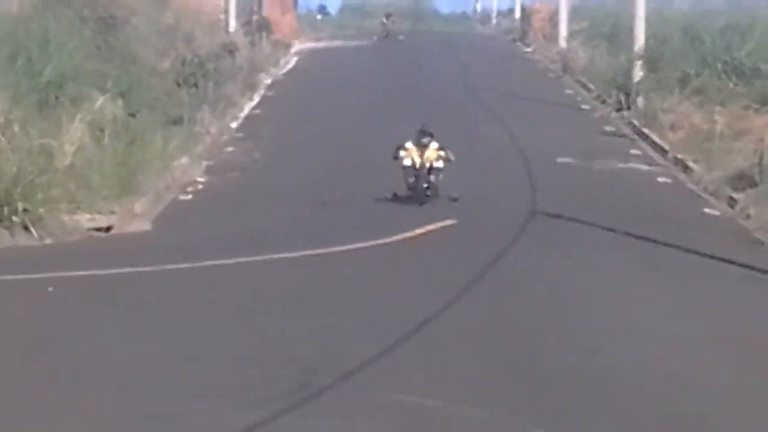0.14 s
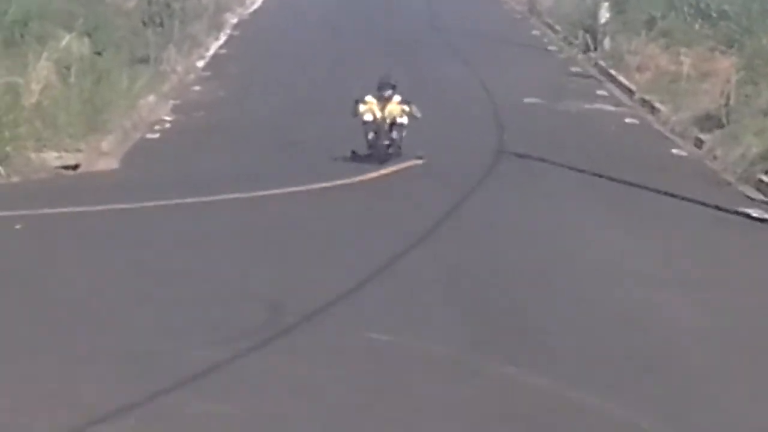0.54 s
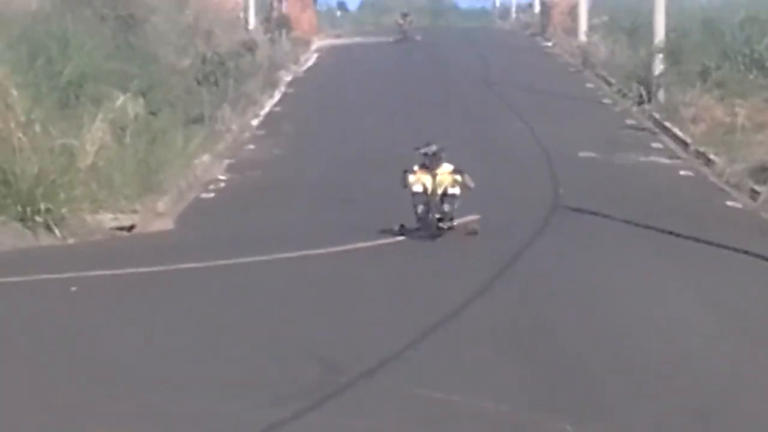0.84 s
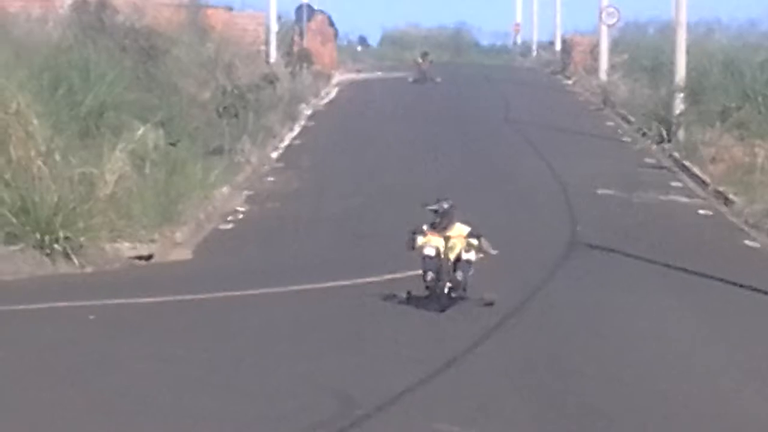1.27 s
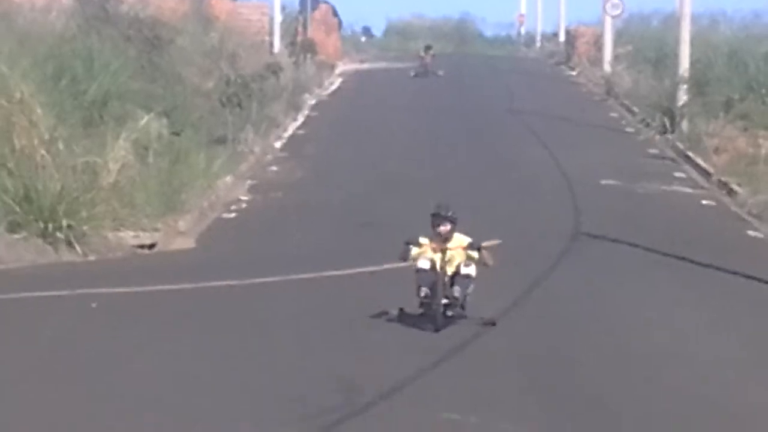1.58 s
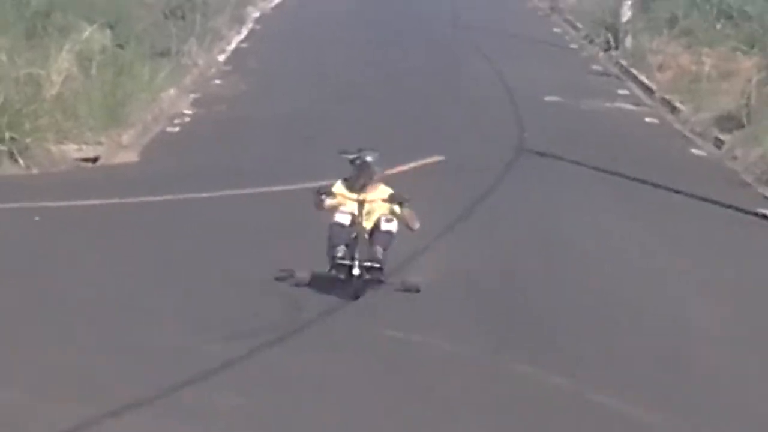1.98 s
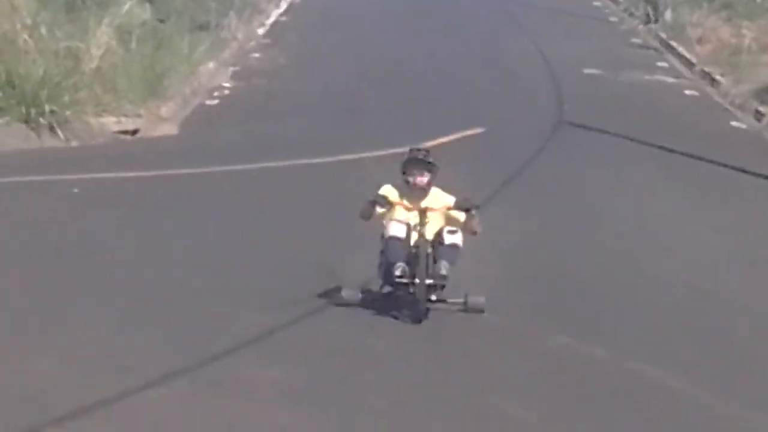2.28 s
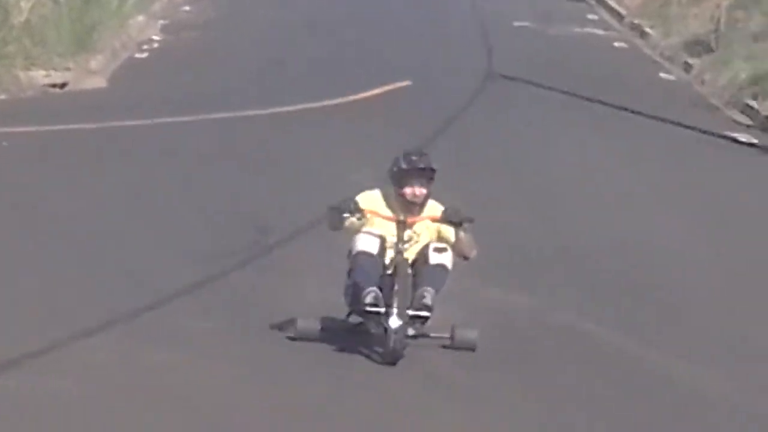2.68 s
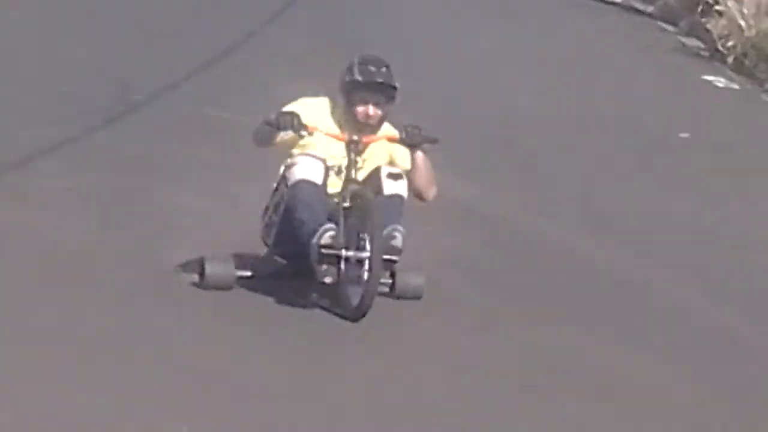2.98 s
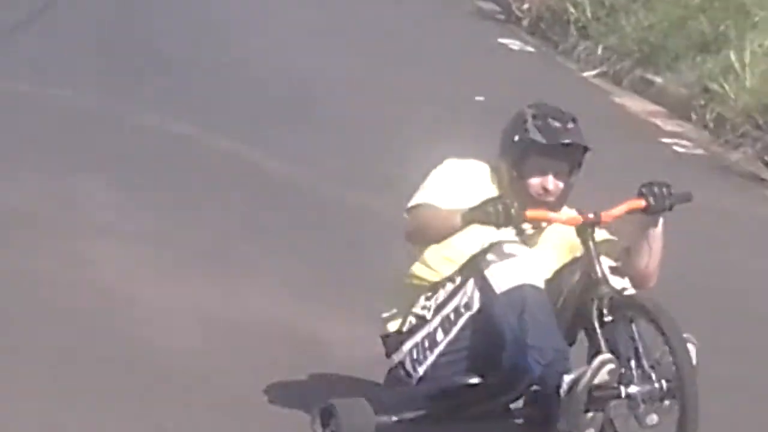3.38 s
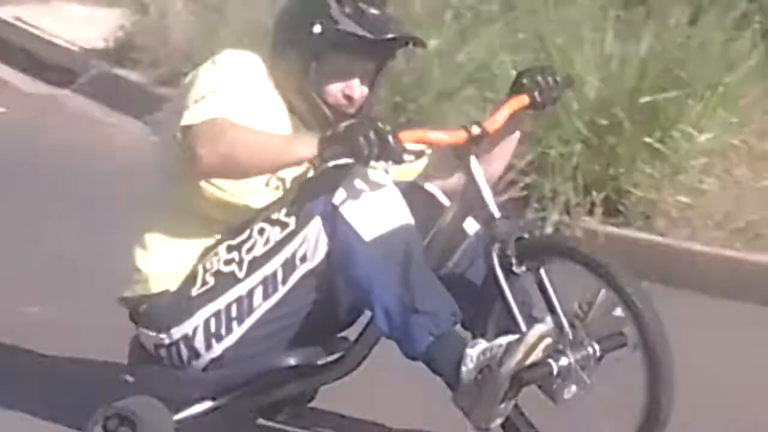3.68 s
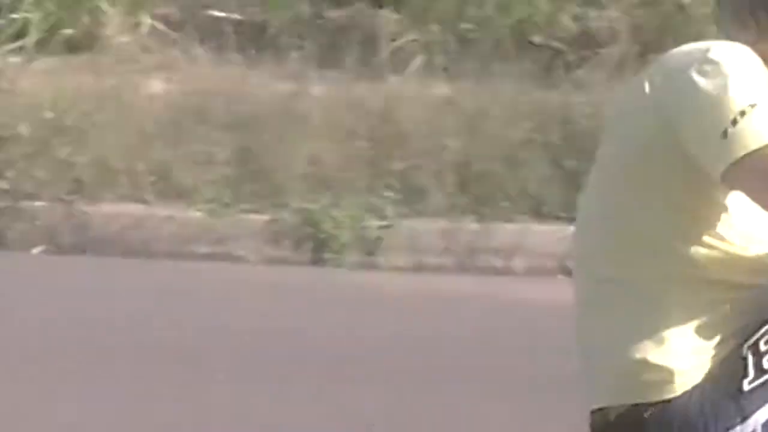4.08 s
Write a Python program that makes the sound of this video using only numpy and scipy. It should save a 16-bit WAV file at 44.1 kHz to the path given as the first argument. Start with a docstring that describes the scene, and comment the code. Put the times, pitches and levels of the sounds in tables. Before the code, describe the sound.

A drift trike with hard plastic rear wheels comes down an open asphalt road toward a small, bass-light microphone. At the start there is a gritty rolling hiss with a rough whirr, a clear mid-pitched ring and small bright pebble ticks; one very faint bird whistle falls at once, and a light knock and scrape follow at 0.1 s. The rolling stays fairly even until about 1.4 s, when it steps up and short wind puffs thump, mostly on the right, until 1.8 s. At 2.2-2.35 s a sudden rasping skid chatters with sharp ticks. Rolling resumes, louder, and from 3.0 s sideways scraping grows, gripping and releasing in abrupt barks and squeaky rasps. From 3.4 s hollow wheels drum and knock close by, the clear ring fades, and scrape tones shift. Heavy knocks and clipped, crackling ticks crowd 3.8-4.2 s as it slides past, still loud at the end.

```python
"""Drift trike sliding past on asphalt

A drift trike with hard plastic rear sleeves rolls down an asphalt road toward a small microphone and slides past.
Random grit impulses excite the sleeves' resonances: a hiss with ringing modes, a whirr and bright pebble ticks.
Sideways slips scrape and grip, the hollow wheels drum and knock on bumps, with sharp ticks of overloaded peaks.
Short puffs of wind thump on the microphone over a low gust, and one faint far bird whistles.
The microphone's small ports thin out the bass; a limiter eases the peaks and the loudest ones clip."""
import sys
import numpy as np
from scipy import signal
from scipy.fft import rfft, irfft, next_fast_len
from scipy.io import wavfile
from scipy.ndimage import uniform_filter1d, minimum_filter1d

SR = 44100
rng = np.random.default_rng(int(sys.argv[2]) if len(sys.argv) > 2 else 0)


def wrap_up_sound(samples):
    """Save the sound to the file named by the first command line argument, as 16-bit audio."""
    columns = np.atleast_2d(samples).T
    # keep every value between -1 and 1, then stretch to whole-number steps
    tamed = np.clip(columns, -1, 1)
    steps = np.round(tamed * 32767).astype(np.int16)
    wavfile.write(sys.argv[1], SR, steps)


def magnitude_from_level(level_db):
    """Linear magnitude for a level in decibels (20 dB per decade)."""
    exponent = np.asarray(level_db, float) / 20
    return 10 ** exponent


N = 186451
T = np.arange(N) / SR
SIZE = next_fast_len(N + 8192)  # transform length, padded so that ringing does not wrap around
HZ = np.fft.rfftfreq(SIZE, 1 / SR)
WAVER_PER_S = 6.4  # how fast each mode swells and fades as the contact patch wanders


def evened(x):
    """Scales to rms 1."""
    return x / np.sqrt(np.mean(x ** 2) + 1e-20)


def curve(points):
    """Reads a time table at every sample."""
    return np.interp(T, *np.transpose(points))


def read(points):
    """Reads a spectrum table on a log-frequency axis."""
    hz, value = np.transpose(points)
    return np.interp(np.log(HZ + 1), np.log(hz + 1), value)


def filtered(x, response):
    """Applies a frequency response to a signal."""
    return irfft(rfft(x, SIZE) * response, SIZE)[..., :N]


def peak(hz, width):
    """Complex response of one mode, gain 1 at its centre."""
    return 1 / (1 + 2j * (HZ - hz) / width)


def band(x, hz, width):
    """Two equal resonances in series leave one band, scaled to rms 1."""
    return evened(filtered(x, peak(hz, width) ** 2))


def lumps(per_s):
    """Slow noise of rms 1: white noise through a one-pole low-pass with its corner at per_s Hz."""
    pole = np.exp(-2 * np.pi * per_s / SR)
    return evened(signal.lfilter([1], [1, -pole], rng.standard_normal(N)))


def body(x, colour, modes, waver_db=5):
    """A broad colour plus the ringing modes of the struck part, each wavering on its own."""
    coloured = filtered(x, magnitude_from_level(read(colour)))
    out = coloured
    for hz, width, db in modes:
        ring = (magnitude_from_level(db) - 1) * filtered(coloured, peak(hz, width))
        out = out + magnitude_from_level(waver_db * lumps(WAVER_PER_S)) * ring
    return out


def grit(per_s, spread_db, lump_per_s, lump_db):
    """Stones meet the wheel at random, a few are large, and they come in clumps."""
    hit = rng.random(N) < per_s / SR
    size = magnitude_from_level(spread_db * np.minimum(rng.exponential(1, N), 4))
    sign = rng.choice([-1., 1.], N)
    return evened(hit * size * sign * magnitude_from_level(lump_db * lumps(lump_per_s)))


def swell(s):
    """Quick rise and slower fall of one puff or knock, peak 1."""
    u = np.maximum(T - s, 0) / 0.0022  # rise time in s
    return u * np.exp(1 - u)


def thump(s, db, hz):
    """A few cycles under one swell, sagging in pitch from 1.15 times hz."""
    sag = 28  # the pitch falls by 2 * sag * hz per second
    u = np.clip(T - s, 0, .5 / sag)  # the phase stops before the pitch reaches zero
    return magnitude_from_level(db) * swell(s) * np.sin(2 * np.pi * hz * u * (1.15 - sag * u))


def recorder_rumble():
    """Faint noise of the recorder below 80 Hz, independent in each channel."""
    low = signal.butter(4, 80, fs=SR, output="sos")
    return magnitude_from_level(-88) * evened(signal.sosfilt(low, rng.standard_normal((2, N))))


def chirp():
    """One faint falling whistle of a far bird: a gliding sine under a half-sine swell."""
    # The whistle: (start [s], length [s], from [Hz], to [Hz], level [dB])
    whistle = (.044, .042, 6250, 5050, -47)
    s, length, from_hz, to_hz, db = whistle
    u = np.clip((T - s) / length, 0, 1)
    phase = 2 * np.pi * np.cumsum(from_hz + (to_hz - from_hz) * u) / SR
    return magnitude_from_level(db) * np.sin(np.pi * u) * np.sin(phase)


def wind():
    """Short thumps with a little turbulence, mostly at the right port, over a lumpy low gust."""
    # Wind puffs before the port gains: (start [s], level [dB], base pitch [Hz])
    puff_rows = [(1.367, -19, 336), (1.383, -32, 370), (1.43, -28, 320), (1.439, -16, 404),
                 (1.455, -21.5, 280), (1.469, -24, 292), (1.489, -22, 550), (1.5, -27, 400),
                 (1.513, -24, 301), (1.534, -40, 620), (1.572, -19, 455), (1.695, -16.5, 457),
                 (1.711, -22, 656), (1.734, -27, 293), (1.754, -25.5, 694), (1.783, -17.5, 484),
                 (1.799, -26.5, 304)]
    # Colour of the turbulence: (frequency [Hz], level [dB])
    puff_colour = [(60, -14.5), (150, -15), (320, -9), (500, -12.5), (800, -15), (1500, -51.5)]
    # Course of the gust before the port gains: (time [s], level [dB])
    gust_course = [(.85, -63), (1.0, -59), (1.3, -57), (1.4, -32), (1.55, -42), (1.85, -42), (2.0, -49.5),
                   (2.25, -33.5), (2.5, -62), (2.6, -78)]
    hiss_db = -11  # turbulence against the thump
    air = rng.standard_normal((3, N))
    # air[0] reaches both ports, the others one port each
    ports = np.array([evened(body(air[0] + 1.4 * own, puff_colour, [])) for own in air[1:]])
    puffs = sum(thump(s, db, hz) + magnitude_from_level(db + hiss_db) * swell(s) * ports for s, db, hz in puff_rows)
    gust = magnitude_from_level(curve(gust_course) + 3.1 * lumps(24)) * ports
    return puffs * magnitude_from_level([[-16], [4]]) + gust * magnitude_from_level([[-3], [2]])  # dB at left, right


def drumming():
    """Hollow wheels drum on the grit up close, surging as they skip."""
    # Colour of the drumming: (frequency [Hz], level [dB])
    drum_colour = [(80, -65), (160, -17), (240, -14), (310, -5.5), (450, -2.5), (620, 0), (830, -4),
                   (1000, -12), (1300, -6), (2000, -28)]
    # Modes of the hollow wheel: (frequency [Hz], width [Hz], boost over the colour [dB])
    drum_modes = [(343.4, 19, 7), (503, 46, 9.5), (654.5, 25, 9.5), (732, 27, 6)]
    # Loudness of the drumming: (time [s], level [dB])
    drum_course = [(0, -45), (2.2, -37.5), (2.225, -32), (2.34, -24.5), (2.36, -36.5), (2.9, -54.5),
                   (2.95, -45), (3.028, -37.5), (3.042, -43), (3.07, -28.5), (3.226, -20.5), (3.294, -25),
                   (3.33, -31.5), (3.348, -20), (3.381, -31.5), (3.409, -12), (3.442, -20.5),
                   (3.541, -18.5), (3.559, -25), (3.582, -17), (3.684, -17.5), (3.706, -25), (3.76, -14.5),
                   (3.77, -15.5), (3.834, -10.5), (3.88, -15.5), (3.89, -17.5), (3.972, -16), (3.99, -14),
                   (4.117, -16.5), (4.126, -18.5), (4.19, -9.5), (4.228, -21.5)]
    bumps = grit(1500, 3, lump_per_s=40, lump_db=1.2)
    drum = evened(body(bumps, drum_colour, drum_modes, waver_db=3))
    return magnitude_from_level(curve(drum_course)) * drum


def knocks():
    """Single low knocks of the hollow wheels on bumps, each a sagging thump."""
    # Knocks: (start [s], level [dB], base pitch [Hz])
    knock_rows = [(0.107, -28.5, 396), (3.168, -13, 454), (3.344, -19, 546), (3.4, -11.5, 584),
                  (3.577, -5.5, 554), (3.617, -10, 620), (3.733, -8.5, 619), (3.785, -7, 651),
                  (3.89, -7.5, 546), (3.986, -9.5, 526), (4.017, -7.5, 520), (4.033, -15, 680),
                  (4.06, -6, 608), (4.088, -8.5, 726), (4.125, -3, 658), (4.15, -5.5, 653),
                  (4.164, -10, 513), (4.193, -8, 628)]
    return sum(thump(*row) for row in knock_rows)


def tick(s, db, hz):
    """A tick: a sine that starts at once and dies in a few cycles."""
    decay_s = .0003  # time constant
    u = np.clip(T - s, 0, 20 * decay_s)
    return magnitude_from_level(db) * 2 * np.exp(-u / decay_s) * np.sin(2 * np.pi * hz * u) * (u < 20 * decay_s)


def overload_ticks():
    """Sharp ticks of overloaded peaks, each a short decaying sine."""
    # Ticks: (start [s], level [dB], pitch [Hz])
    tick_rows = [(1.785, -16.5, 1500), (2.2596, -8.5, 3000), (2.292, -16, 4500), (3.082, -12.5, 3000),
                 (3.833, -5, 3500), (3.896, -10, 2500), (4.0074, -1.5, 4020), (4.038, -6, 4000),
                 (4.182, -5.5, 4500), (4.191, -12, 3000)]
    return sum(tick(*row) for row in tick_rows)


def pebbles(roll_db):
    """Sparse kicked pebbles tick brightly, 28 dB under the rolling hiss."""
    kicked = grit(60, 2.4, lump_per_s=1.7, lump_db=3.5)
    return magnitude_from_level(roll_db - 28) * band(kicked, 4700, 1400)


def rolling(roll_db):
    """The same grit gives the rolling hiss, the rough whirr and the sleeve's clearest ring."""
    # Colour of the grit, with the notches of the road bounce: (frequency [Hz], level [dB])
    roll_colour = [(100, -48), (180, -22.5), (400, -10.5), (700, -6), (790, -18), (900, -4.5), (1190, -9.5),
                   (1500, -5), (2400, -5), (4600, -8), (5400, -17.5), (7000, -35), (9500, -116)]
    # Modes of the rolling sleeve: (frequency [Hz], width [Hz], boost over the colour [dB])
    roll_modes = [(1870, 51, 4.5), (2100, 60, 4.5), (2640, 96, 2), (3438, 100, 5.5)]
    # Brightness of the hiss above 2.5 kHz: (time [s], level [dB])
    treble_course = [(0, -2.5), (.7, 2.5), (1.4, 3), (1.78, 0.5), (1.82, 0), (2.1, 2), (2.15, -2.5),
                     (2.4, 1), (2.7, 2), (3.0, -1.5), (3.3, 0.5), (4.23, 2.5)]
    # The broad rough band: (time [s], level over the rolling loudness [dB])
    whirr_course = [(0, -10), (.9, -7.5), (1.77, -19), (1.79, -10), (2.1, -11.5), (2.4, -17), (2.7, -7.5),
                    (3.05, -11), (3.3, -18), (4.23, -14)]
    # The clear ring, which fades once the trike is side-on: (time [s], level over the rolling loudness [dB])
    ring_course = [(0, -13.5), (1.0, -11), (1.5, -10), (2.5, -9), (3.2, -9.5), (3.47, -7), (3.55, -15),
                   (4.23, -18)]
    stones = grit(9000, 4.7, lump_per_s=20, lump_db=1.5)
    hiss = evened(body(stones, roll_colour, roll_modes, waver_db=3.5))
    high = signal.butter(2, 2500, "high", fs=SR, output="sos")
    hiss = hiss + (magnitude_from_level(curve(treble_course)) - 1) * signal.sosfiltfilt(high, hiss)
    whirr = magnitude_from_level(curve(whirr_course)) * band(stones, 1995, 300)
    ring = magnitude_from_level(curve(ring_course) + .8 * lumps(WAVER_PER_S)) * band(stones, 1033, 81)
    return magnitude_from_level(roll_db) * (hiss + whirr + ring)


def hold(s, length):
    """An event that catches quickly, holds and lets go."""
    catch_s, release_s = .002, .003
    return np.clip((T - s) / catch_s, 0, 1) * np.clip((s + length - T) / release_s + 1, 0, 1)


def grip(scrape, s, db, length, hz):
    """The scrape presses harder for a moment and rings the sleeve at one pitch."""
    press_s, ring_width, ring_db = .008, 220, 4.5  # levelling time in s, width in Hz, dB over the scrape
    at = slice(round((s - .01) * SR), round((s + length + .02) * SR))
    # under pressure the scrape holds an even level
    local_rms = np.sqrt(uniform_filter1d(scrape[at] ** 2, round(press_s * SR)) + 1e-9)
    pressed = scrape[at] / local_rms
    ring = signal.lfilter(*signal.iirpeak(hz, hz / ring_width, SR), pressed)
    out = np.zeros(N)
    out[at] = magnitude_from_level(db) * hold(s, length)[at] * (pressed + magnitude_from_level(ring_db) * ring)
    return out


def scraping():
    """Sideways slips scrape the sleeves, whose audible modes change as the trike turns; grips chatter."""
    # Colour of the scrape: (frequency [Hz], level [dB])
    scrape_colour = [(59, -81.5), (100, -48.5), (577, 10), (1210, -9.5), (1650, -3), (2370, -2.5),
                     (4520, -4), (6880, -16), (9510, -22.5), (12400, -90.5), (20900, -120)]
    # Modes heard from the front, half turned, from the side: (frequency [Hz], width [Hz], boost [dB])
    front_modes = [(1610, 240, 12.5), (2943, 65, 15.5), (4590, 690, 10.5), (6670, 36, 9.5)]
    quarter_modes = [(1670, 56, 9), (2030, 310, 1.5), (2820, 250, 6), (4290, 190, 5.5), (5110, 360, 7)]
    side_modes = [(1299, 18, 18.5), (1462, 26, 14.5), (1907, 46, 13), (2440, 44, 10), (5360, 440, 15)]
    # How far the trike has swung side-on: (time [s], share [0-1])
    swing = [(2.9, 0.0), (3.15, 0.23), (3.599, 0.52), (3.8, 0.83)]
    # Loudness of the sideways slide: (time [s], level [dB])
    slide_course = [(0.0, -37.5), (1.35, -38), (1.45, -35.5), (1.65, -59.5), (2.0, -29), (2.205, -30.5),
                    (2.225, -15.5), (2.335, -20.5), (2.355, -33.5), (2.9, -27), (3.059, -21), (3.301, -19),
                    (3.399, -18.5), (3.679, -15), (3.699, -23), (3.73, -20.5), (3.76, -25), (3.781, -24),
                    (3.85, -14.5), (4.181, -31), (4.23, -36)]
    # Sudden grips on the road that let go abruptly: (start [s], level [dB], length [s], pitch [Hz])
    grip_rows = [(0.101, -25, 0.01, 2150), (2.213, -14.5, 0.0072, 3070), (2.236, -17, 0.0039, 1610),
                 (2.254, -22.5, 0.0098, 1560), (2.275, -20, 0.015, 1580), (2.295, -28, 0.012, 1106),
                 (2.31, -20.5, 0.0086, 1520), (2.32, -18.5, 0.008, 1600), (2.333, -15, 0.0038, 4550),
                 (2.997, -26, 0.023, 1610), (3.056, -18.5, 0.027, 1615), (3.132, -15.5, 0.015, 1920),
                 (3.19, -17, 0.028, 3920), (3.22, -18, 0.019, 1650), (3.251, -9.5, 0.0072, 1610),
                 (3.35, -22.5, 0.018, 4700), (3.372, -17, 0.0085, 4480), (3.4, -13.5, 0.0097, 2820),
                 (3.414, -11.5, 0.014, 4350), (3.431, -19, 0.026, 2610), (3.502, -13, 0.0069, 2880),
                 (3.524, -16.5, 0.02, 1960), (3.56, -19.5, 0.039, 2100), (3.638, -28, 0.038, 2820),
                 (3.734, -22, 0.028, 1665), (3.821, -12, 0.024, 2240), (3.877, -11, 0.0099, 1840),
                 (3.945, -14.5, 0.0062, 2430), (3.987, -16, 0.01, 2300), (4, -14, 0.012, 2540),
                 (4.033, -12, 0.012, 5360), (4.042, -17, 0.018, 2190), (4.174, -10, 0.017, 1354)]
    slips = grit(5000, 3, lump_per_s=70, lump_db=2)
    side_on = np.clip(curve(swing), 0, 1)
    rasp = np.zeros(N)
    for k, modes in enumerate((front_modes, quarter_modes, side_modes)):
        share = np.clip(1 - abs(2 * side_on - k), 0, 1)  # crossfade between neighbouring views
        rasp = rasp + share * evened(body(slips, scrape_colour, modes))
    high = signal.butter(2, 800, "high", fs=SR, output="sos")
    bite = signal.sosfilt(high, rasp)  # grips carry less bass
    return magnitude_from_level(curve(slide_course)) * rasp + sum(grip(bite, *row) for row in grip_rows)


def wheel():
    """One rear wheel on its own grit: rolling, pebbles, scraping and drumming."""
    # Loudness as the wheels near, stepping up where the road turns coarser: (time [s], level [dB])
    roll_course = [(0.0, -30.5), (0.4, -29.5), (0.82, -31), (1.0, -32), (1.41, -30.5), (1.46, -25),
                   (1.782, -27.5), (1.788, -23), (2.11, -24), (2.13, -25.5), (2.2, -21), (2.35, -19.5),
                   (2.62, -21.5), (2.78, -19.5), (3.0, -17), (3.3, -19), (3.67, -19), (3.7, -24.5),
                   (3.76, -17.5), (4.23, -21.5)]
    roll_db = curve(roll_course)
    return rolling(roll_db) + pebbles(roll_db) + scraping() + drumming()


def at_ports(left, right):
    """Blends two sides into the two ports, with their likeness, level difference and lag."""
    # Likeness of the ports, less at both ends of the spectrum: (frequency [Hz], correlation [0-1])
    likeness = [(60, .5), (250, 0.96), (520, 0.93), (1060, 0.87), (2160, 0.86), (4420, 0.89), (9060, 0.16)]
    # Level of the left port over the right: (frequency [Hz], level [dB])
    left_over_right = [(60, 29.5), (140, -0.5), (320, -1.5), (740, -1.5), (1700, -0.5), (3930, -2.5),
                       (9060, -2)]
    left_lag = 2.5e-5  # s between the two ports
    left, right = rfft(left, SIZE), rfft(right, SIZE)
    same = np.clip(read(likeness), 0, 1)
    shared = np.sqrt((1 + same) / 2) * (left + right)
    apart = np.sqrt((1 - same) / 2) * (left - right)
    # half of the difference and lag goes to each port
    tilt = magnitude_from_level(read(left_over_right) / 2) * np.exp(-1j * np.pi * HZ * left_lag)
    return irfft(np.array([(shared + apart) * tilt, (shared - apart) / tilt]), SIZE)[:, :N]


def scene():
    """Two rear wheels, knocks fed to the left and ticks to the right, with wind and a bird."""
    left = wheel() / np.sqrt(2) + knocks()
    right = wheel() / np.sqrt(2) + overload_ticks()
    return at_ports(left, right) + wind() + chirp()


def roll_off(x):
    """The treble ends steeply here."""
    return signal.sosfilt(signal.butter(12, 9700, fs=SR, output="sos"), x)


def record(dry):
    """The microphone's small ports thin out the bass; a limiter eases the peaks and the loudest clip."""
    # Response of the microphone: (frequency [Hz], level [dB])
    mic_response = [(30, -39), (90, -31.5), (150, -3.5), (250, -1), (7000, -1), (8000, -1), (10000, 2.5)]
    limit_db, limit_s = -4.5, .003  # peak level above which the dB excess is halved, and its time window
    heard = filtered(dry, magnitude_from_level(read(mic_response)))
    reach = round(limit_s * SR)
    highest = -minimum_filter1d(-abs(heard).max(0), reach)  # running maximum
    peaks = uniform_filter1d(highest, reach)
    heard = heard / np.sqrt(np.maximum(peaks / magnitude_from_level(limit_db), 1))
    return roll_off(np.clip(heard + recorder_rumble(), -1, 1))


dry = scene()
out = record(dry)
wrap_up_sound(out)
```